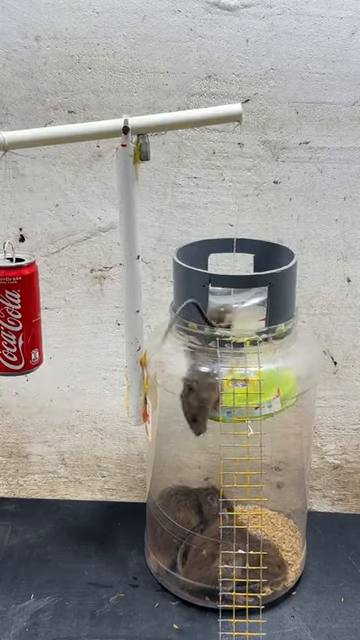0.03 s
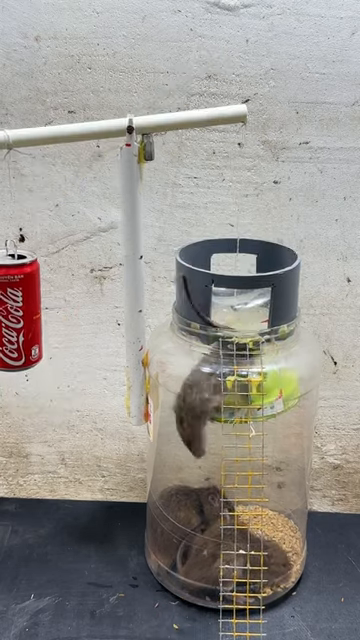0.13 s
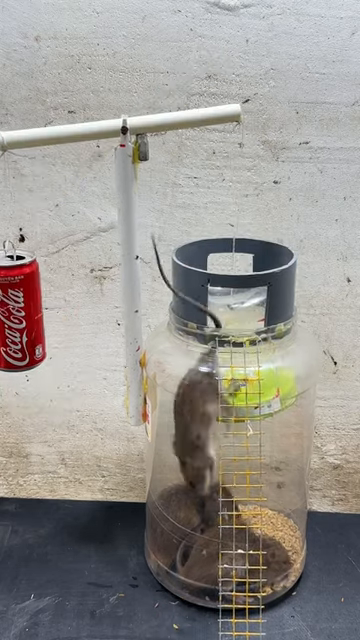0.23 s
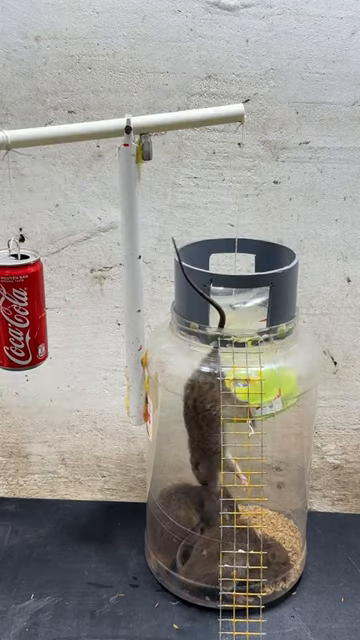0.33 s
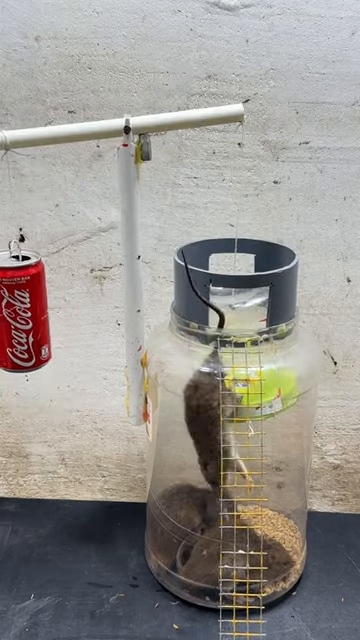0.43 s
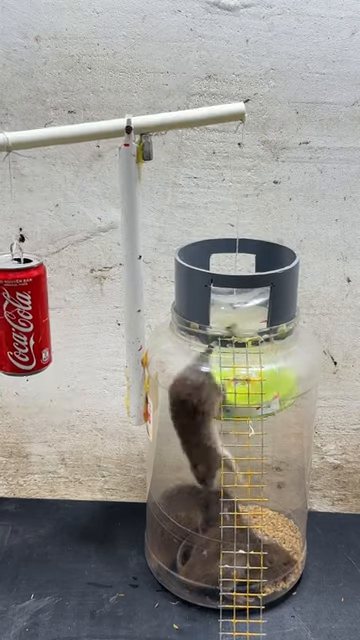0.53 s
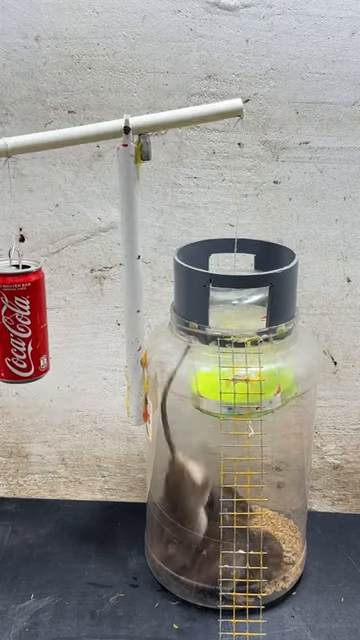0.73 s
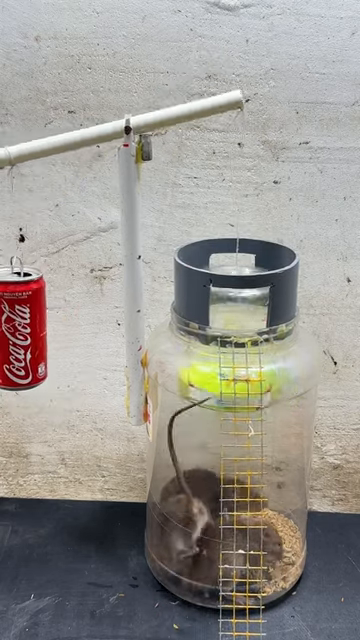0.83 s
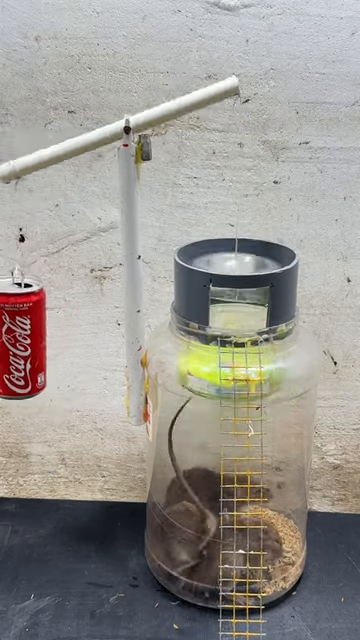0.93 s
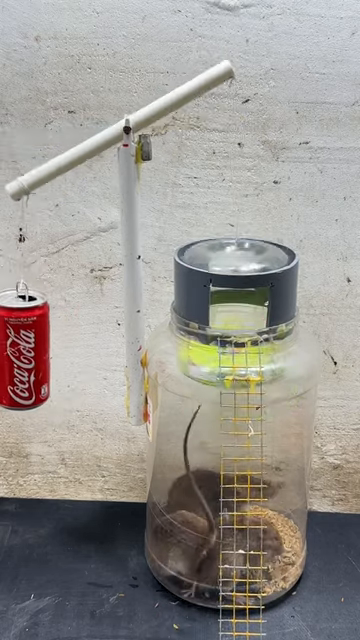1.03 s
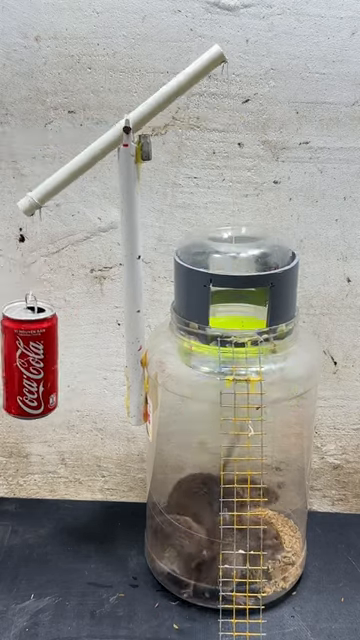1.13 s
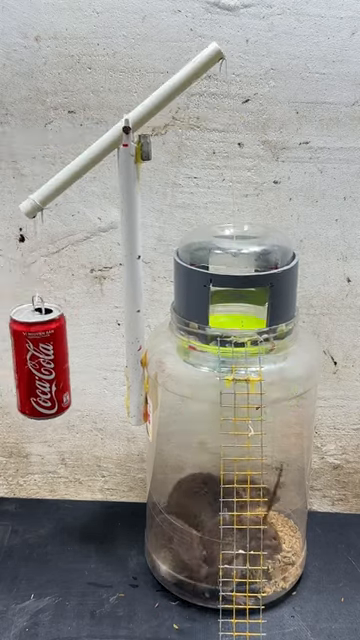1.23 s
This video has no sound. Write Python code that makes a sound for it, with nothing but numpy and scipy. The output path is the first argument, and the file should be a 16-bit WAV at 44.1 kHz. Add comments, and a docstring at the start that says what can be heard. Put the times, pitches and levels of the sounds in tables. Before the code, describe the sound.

A rat drops into a big jar with hollow thumps, claws ticking and scraping. A short squeak comes just before the loudest bump, then the trap's pipe lever and lid clack. Heard close in a small room with a low rumble.

```python
"""A rat drops into a big jar trap and scrambles over the others, its body making the jar wall boom.
Claws tick and scrape as they catch and slip, over a faint rustle; there is one thin tink and a short squeak.
The pipe lever and lid clack and ring as the trap shuts, and heavy landings shake the table.
All this is in a small room with a low rumble, heard through two close microphone openings."""
import sys
import numpy as np
from scipy import signal
from scipy.fft import rfft, irfft
from scipy.io import wavfile
from scipy.ndimage import uniform_filter1d

SR = 44100
rng = np.random.default_rng(int(sys.argv[2]) if len(sys.argv) > 2 else 0)


def transcribe(signal):
    """Save signal, clipped to [-1, 1], as a 16-bit WAV file at the path in sys.argv[1]."""
    frames = np.atleast_2d(signal).T
    limited = np.clip(frames, -1, 1)
    pcm = np.round(limited * 32767).astype(np.int16)
    wavfile.write(sys.argv[1], SR, pcm)


N = 57330
T = np.arange(N) / SR
HZ = np.maximum(np.arange(N // 2 + 1) * SR / N, 1)

# tone of the room's rumble (f/Hz, level/dB)
RUMBLE_TONE = [(20, -41), (30, -16), (42, 5), (52, 6), (63, -7.5), (82, -2.5), (100, -6), (130, -12.5),
               (250, -11), (450, -17), (1000, -29), (2500, -39), (5000, -42.5), (8500, -52.5),
               (12000, -64.5), (16000, -44.5)]
# tone of the rustle (f/Hz, level/dB)
RUSTLE_TONE = [(2000, 2.5), (4000, -4), (7500, 5), (9500, -7), (11500, -22), (15000, -11)]
# notes the jar rings at (f/Hz, level/dB, time to fade by 60 dB/s)
JAR_NOTES = [(86.4, -12.5, 0.24), (162.7, -27.5, 0.75), (177, 3, 0.26), (235.7, -2.5, 0.2), (299.4, -11, 1),
             (360, -17, 0.027), (525.1, -4, 0.14), (730, -26, 0.21), (1000, -23.5, 0.1), (1317, -15, 0.088),
             (1952, -34, .07), (2537, -15, 0.11), (2500, -21, .05), (4040, -20, 0.056)]
# bodies hitting the jar (t/s, level/dB, contact time/ms)
THUMPS = [(0.010, -34.5, 0.65), (0.031, -29, 2.9), (0.0487, -32.5, 1.2), (0.1464, -33.5, 2.3),
          (0.1875, -25.5, 4), (0.2386, -25, 0.23), (0.2425, -18, 0.18), (0.2474, -14, 0.17),
          (0.2596, -17, 0.43), (0.2732, -30, 1.5), (0.3825, -22, 3.3), (0.4, -32.5, 1.36),
          (0.4951, -28, 3.4), (0.5999, -31.5, 0.62), (0.635, -35.5, 1.), (0.746, -28.5, 1.6),
          (1.056, -46.5, .6), (1.0674, -36.5, 1.2), (1.0726, -35.5, 2.6), (1.1082, -36, 1.1)]
# scuffles and slides (peak t/s, rise/s, decay/s, level/dB, treble tilt/dB per octave)
SCRAPES = [(0.013, 0.0061, 0.023, -38.5, 0), (0.047, .006, 0.01, -48, 13), (0.095, 0.1, 0.12, -37.5, 16),
           (0.188, 0.017, 0.071, -41, 7), (0.253, 0.0062, .04, -21.5, -11), (0.549, 0.019, 0.021, -41.5, 1),
           (0.601, 0.0026, 0.036, -32, -6.5), (0.656, 0.022, 0.047, -40.5, 2.5),
           (0.75, 0.073, 0.056, -35, -1.5), (0.823, 0.0045, 0.026, -39, -2.5),
           (0.86, 0.0037, 0.038, -48.5, 1.5), (0.971, .03, 0.052, -50.5, 1),
           (1.064, 0.018, 0.033, -30.5, -11), (1.131, 0.0027, 0.017, -39, -2.5),
           (1.158, 0.014, 0.039, -37.5, -3.5), (1.216, 0.016, 0.035, -40.5, -5)]
# tone of a scrape (f/Hz, level/dB)
SCRAPE_TONE = [(100, -44.5), (200, 7.5), (310, 5.5), (430, -4.5), (650, 1.5), (1000, 0), (1400, -5),
               (1900, -3), (2600, -6.5), (3500, -11.5), (7500, -20.5), (11000, -30.5), (16000, -31)]
# claws tapping the wall (t/s, level/dB, decay/s, treble tilt/dB per octave)
TICKS = [(0.024, -37.5, 0.0021, 6), (0.041, -41, 0.002, 7), (0.1306, -36, 0.0073, 1.5),
         (0.238, -22.5, 0.0075, -6), (0.244, -18.5, 0.0032, 15), (0.2478, -15, 0.0019, 8),
         (0.2524, -19.5, 0.0058, -5.5), (0.2629, -25.5, 0.0061, 0), (0.269, -37.5, 0.013, -3),
         (0.3132, -29.5, 0.0044, 2.5), (0.4198, -34, 0.0034, -0.5), (0.478, -36.5, 0.003, -1.5),
         (0.524, -38.5, .008, -5.5), (0.671, -30.5, 0.0054, -4), (0.882, -43, 0.025, 12),
         (1.05, -46, 0.016, 11)]
# tone of a claw tick (f/Hz, level/dB)
CLAW_TONE = [(400, -5), (1200, -6.5), (2400, 4.5), (4400, -2.5), (5600, 0.5), (7000, 0.5), (7600, -5),
             (9300, -1), (11500, -25), (14500, -10), (16000, -12)]
# notes the lever and lid ring at (f/Hz, level/dB, time to fade by 60 dB/s)
LID_NOTES = [(482, -21, 0.12), (599.3, -16, 0.25), (783, -36, 0.075), (979, 0.5, 0.038), (1030, -8, 0.059),
             (1133, -13, 0.11), (1770, -19, 0.039), (2207, -9.5, 0.019), (2960, -11, 0.025),
             (3230, -18, 0.018)]
# hits of the lever and lid (t/s, ring level/dB, pitch factor, crack level/dB)
CLACKS = [(0.0425, -29, .8, -32), (0.6738, -18, 1., -30), (0.716, -37, 1., -38), (0.7382, -23, 1.02, -27),
          (0.7435, -24, .78, -44), (1.147, -32, .61, -35), (1.162, -31, .75, -35)]
# tone of the crack that starts a clack (f/Hz, level/dB)
CRACK_TONE = [(200, 1), (700, 4.5), (1900, 5.5), (2700, -1), (3600, -34), (7000, -35.5), (16000, -51)]
# tone of the tink (f/Hz, level/dB)
TINK_TONE = [(4000, -24), (8000, -11), (11500, -9), (13000, -2), (13800, 3), (15000, -4), (16000, -8)]
# pitch and loudness along the squeak (t/s, f/Hz, level/dB)
SQUEAK_PATH = [(0.181, 1430, -37.5), (0.185, 1562, -43.5), (0.1888, 1745, -36), (0.191, 1854, -36),
               (0.195, 1916, -30), (0.206, 1971, -40.5), (0.211, 1970, -35.5), (0.216, 1946, -35.5),
               (0.229, 1970, -33), (0.237, 1960, -55)]
# heavy landings (t/s, level/dB)
LANDINGS = [(0.255, -31.5), (0.595, -30), (0.664, -35.5)]
# notes the table rings at (f/Hz, level/dB, time to fade by 60 dB/s)
TABLE_NOTES = [(85, -9, 0.28), (103.4, 1, 0.25)]
# how far the wave at the left opening is ahead of the right (f/Hz, phase/rad)
LEFT_LEAD = [(100, 0), (860, 0.28), (3500, -0.5), (5200, 1.34), (6100, 0.6), (7000, -1.26), (8600, -1.5),
             (10000, -3), (15000, -3.5)]


def gain(db):
    """Turn decibels into a number to multiply by."""
    return 10 ** (np.asarray(db) / 20)


def along_hz(points):
    """Join (frequency, value) points with lines that are straight when octaves are evenly spaced."""
    hz, value = np.array(points, float).T
    return np.interp(np.log(HZ), np.log(hz), value)


def colour(x, tone, tilt=0):
    """Give x a tone and an average (rms) size of 1; a positive tilt makes it brighter."""
    octaves = np.log2(np.maximum(HZ, 200) / 1000)
    shaped = irfft(rfft(x) * gain(along_hz(tone) + tilt * octaves), N)
    return shaped / np.std(shaped)


def noise(tone, tilt=0):
    """Random noise with the given tone."""
    return colour(rng.standard_normal(N), tone, tilt)


def swell(at, rise, decay):
    """A loudness curve that grows to a peak, then dies away."""
    return np.exp(-np.maximum(at - T, 0) / rise - np.maximum(T - at, 0) / decay)


def waver(samples):
    """A random wobble of typical size 1, smoothed over this many samples."""
    wobble = uniform_filter1d(rng.standard_normal(N), size=samples)
    return wobble / np.std(wobble)


def ring(notes, at, pitch=1, contact_ms=0):
    """The fading notes of a struck object; a longer, softer hit gives less of the high ones."""
    age = np.maximum(T - at, 0)
    sound = np.zeros(N)
    for hz, db, fade_s in notes:
        softening = 1 + (hz * contact_ms / 1000) ** 2
        sound += gain(db - 60 * age / fade_s) * np.sin(2 * np.pi * hz * pitch * age) / softening
    return sound


def spread(middle, side, side_from_hz=530, side_db=-4):
    """Sound from all around: the bass is alike left and right, the treble less so."""
    side = gain(side_db) * signal.sosfilt(signal.butter(2, side_from_hz, "high", fs=SR, output="sos"), side)
    return np.array([middle + side, middle - side])


def rumble(level_db=-39):
    """The room's steady low noise."""
    return gain(level_db) * spread(noise(RUMBLE_TONE), noise(RUMBLE_TONE))


def rustle(start_db=-53.5, fade_db_per_s=15.5):
    """A faint, high hiss that fades as the animals settle."""
    return noise(RUSTLE_TONE) * gain(start_db - fade_db_per_s * T)


def jar_thumps(build_up_s=0.00089):
    """Soft bodies set the jar wall booming; the wall takes a moment to start swinging."""
    sound = np.zeros(N)
    for at, db, contact_ms in THUMPS:
        build_up = 1 - np.exp(-np.maximum(T - at, 0) / build_up_s)
        sound += gain(db) * ring(JAR_NOTES, at, contact_ms=contact_ms) * build_up
    return sound


def scrapes(grains_per_s=4500, spread_db=1.5, flicker_db=2.5):
    """Claws catch and slip, making crowds of tiny clicks (grains) in short, uneven surges."""
    grains = (rng.random(N) < grains_per_s / SR) * rng.standard_normal(N)
    grains *= gain(spread_db * np.minimum(rng.exponential(size=N), 4))  # a few stand out
    grains *= gain(flicker_db * waver(samples=300))
    return sum(gain(db) * colour(grains, SCRAPE_TONE, tilt) * swell(at, rise, decay)
               for at, rise, decay, db, tilt in SCRAPES)


def claw_ticks(rise_s=0.00047):
    """Each tap of a claw on the wall is a tiny burst of noise."""
    return sum(gain(db) * noise(CLAW_TONE, tilt) * swell(at, rise_s, decay) for at, db, decay, tilt in TICKS)


def lid_clacks(rise_s=0.00089, decay_s=0.0069):
    """Hard parts meet with a short crack, and the lever and lid ring."""
    crack = noise(CRACK_TONE)
    return sum(gain(ring_db) * ring(LID_NOTES, at, pitch)
               + gain(crack_db) * crack * swell(at, rise_s, decay_s)
               for at, ring_db, pitch, crack_db in CLACKS)


def tink(level_db=-31):
    """One very high, thin click."""
    return gain(level_db) * noise(TINK_TONE) * swell(at=0.133, rise=0.001, decay=0.0015)


def squeak(pitch_wobble=0.03, flutter_db=3):
    """A thin, unsteady note that slides up and holds."""
    times, hz, db = np.array(SQUEAK_PATH).T
    pitch_hz = np.interp(T, times, hz) * (1 + pitch_wobble * waver(samples=90))
    loudness = np.interp(T, times, gain(db), left=0, right=0) * gain(flutter_db * waver(samples=90))
    return loudness * np.sin(2 * np.pi * np.cumsum(pitch_hz) / SR)


def table_thuds():
    """The weight of a landing passes through the jar's base and shakes the table."""
    return sum(gain(db) * ring(TABLE_NOTES, at) for at, db in LANDINGS)


def room_echo(x, bass_fade_s=0.45, treble_fade_s=0.18, split_hz=3100, build_up_s=0.0022):
    """Sound bouncing around the room blurs into a tail whose treble dies first."""
    hiss = rng.standard_normal((2, N))
    bass = signal.sosfilt(signal.butter(1, split_hz, fs=SR, output="sos"), hiss)
    tail = bass * gain(-60 * T / bass_fade_s) + (hiss - bass) * gain(-60 * T / treble_fade_s)
    tail *= 1 - np.exp(-T / build_up_s)
    tail /= np.sqrt(np.sum(tail[0] ** 2))
    return spread(*signal.fftconvolve(x[None], tail, axes=1)[:, :N])


def scene(boom_echo_db=-23, scramble_echo_db=-9.5):
    """The trap and room reach the two openings out of step in the treble; the tink sits in the middle."""
    boom = jar_thumps() + table_thuds()
    scramble = lid_clacks() + claw_ticks() + scrapes() + rustle() + squeak()
    room = room_echo(gain(boom_echo_db) * boom + gain(scramble_echo_db) * scramble) + rumble()
    phase_shift = np.exp(0.5j * along_hz(LEFT_LEAD) * np.array([[1], [-1]]))  # half to each side
    return irfft(rfft(boom + scramble + room) * phase_shift, N) + tink()


def record(dry, bottom_hz=15, top_hz=16200):
    """The recorder cuts the deepest bass and the highest treble."""
    dry = signal.sosfilt(signal.butter(1, bottom_hz, "high", fs=SR, output="sos"), dry)
    return signal.sosfilt(signal.ellip(8, 0.2, 70, top_hz, fs=SR, output="sos"), dry)


dry = scene()
out = record(dry)
transcribe(out)
```